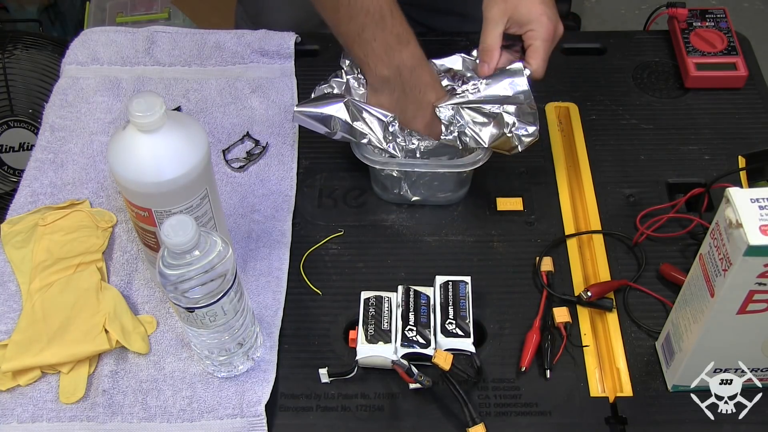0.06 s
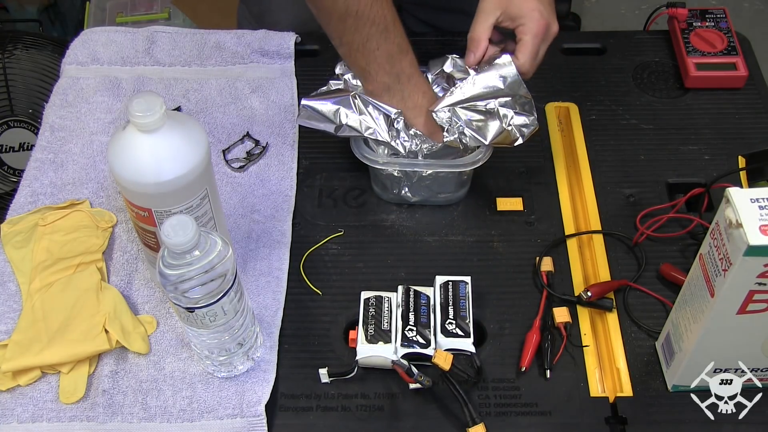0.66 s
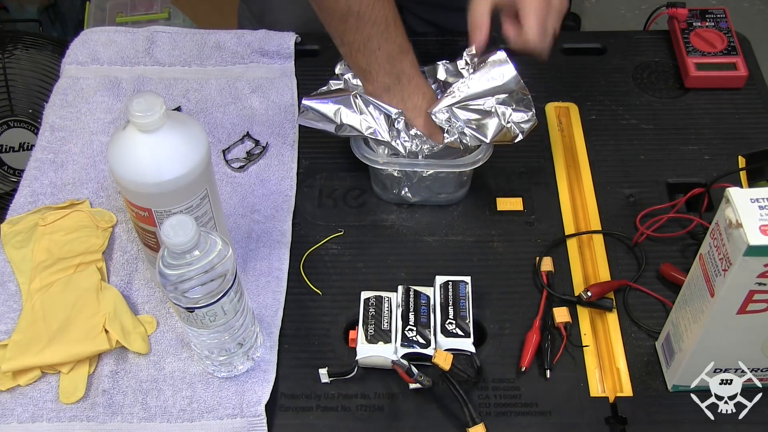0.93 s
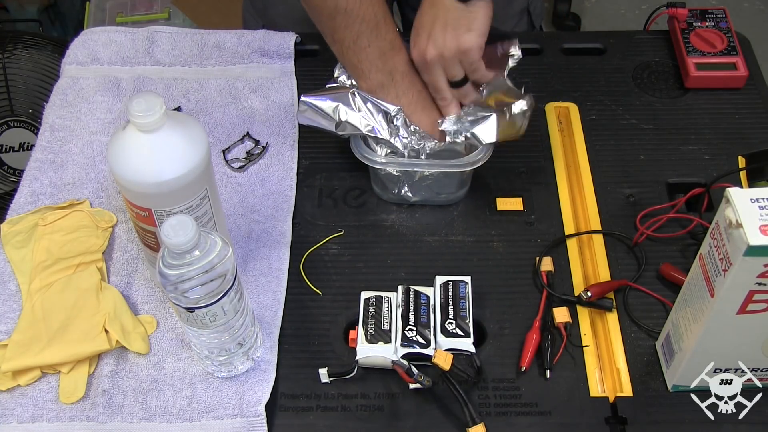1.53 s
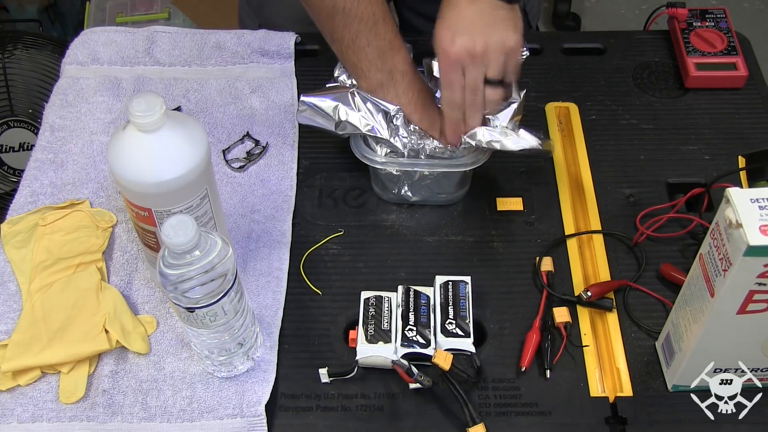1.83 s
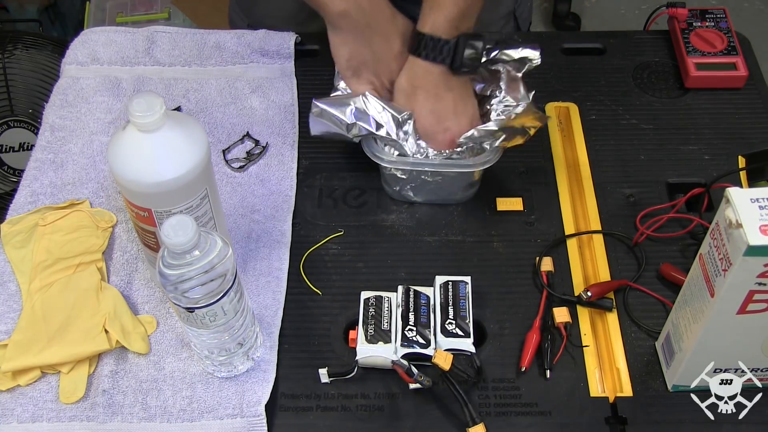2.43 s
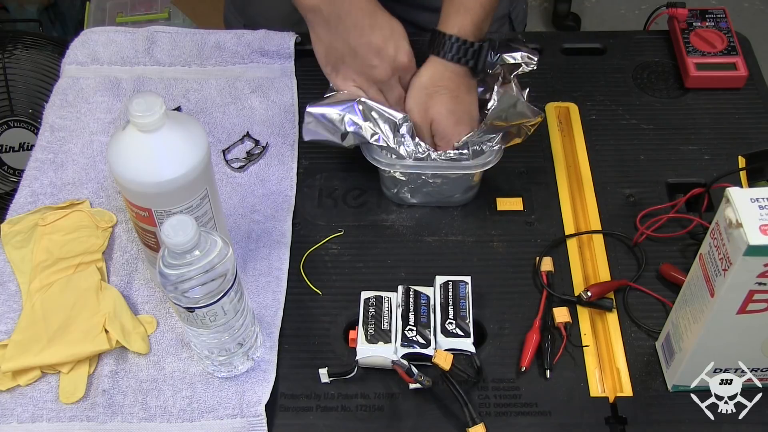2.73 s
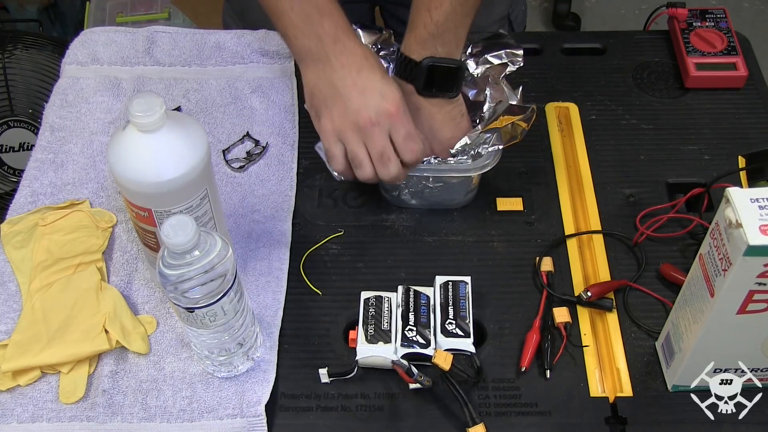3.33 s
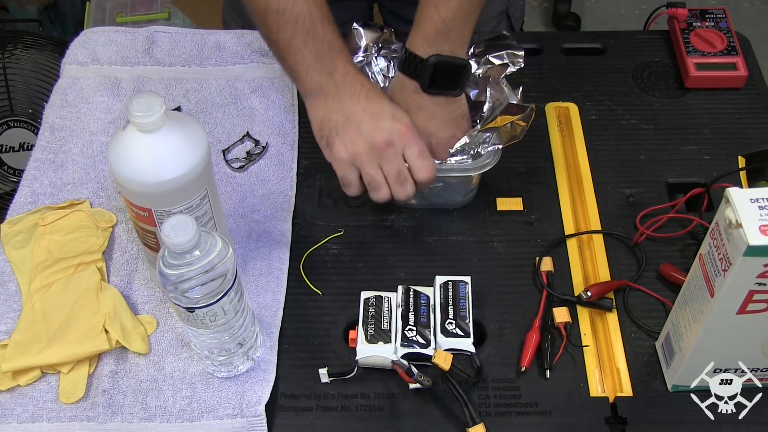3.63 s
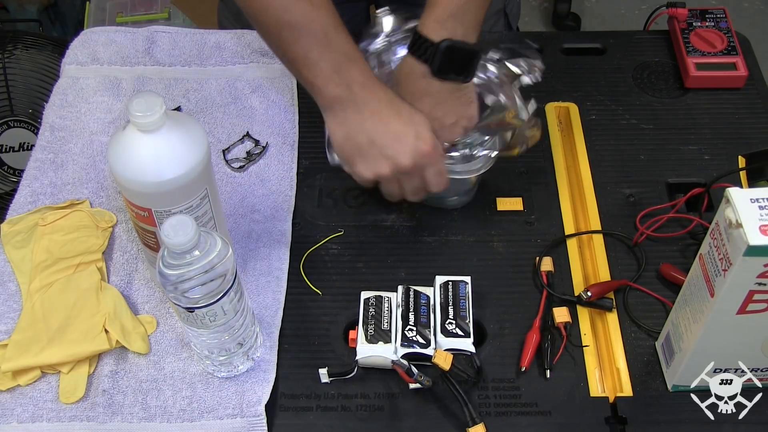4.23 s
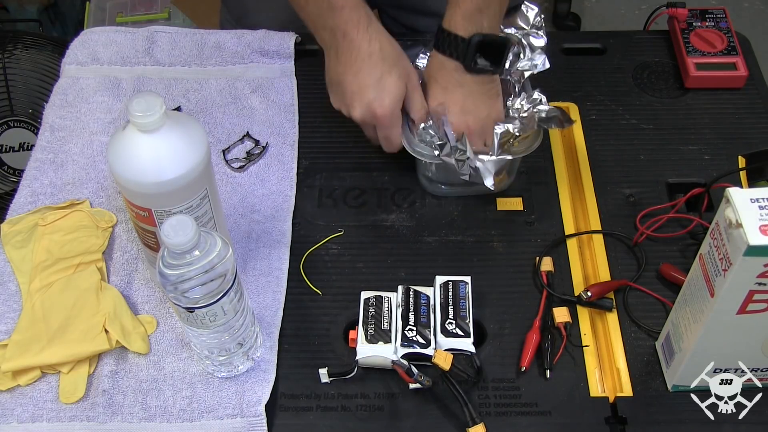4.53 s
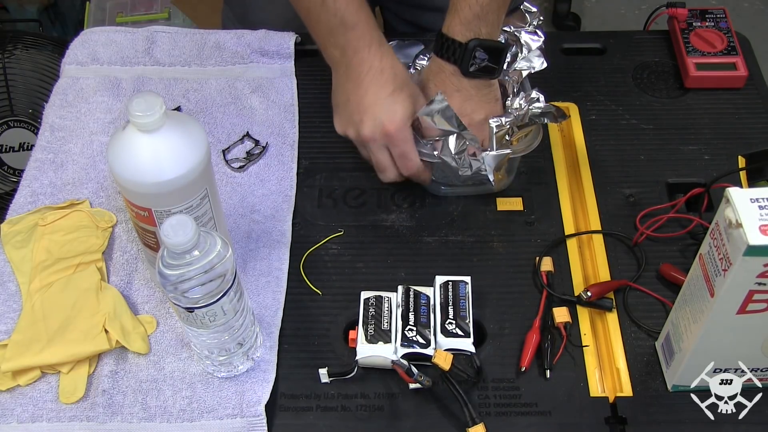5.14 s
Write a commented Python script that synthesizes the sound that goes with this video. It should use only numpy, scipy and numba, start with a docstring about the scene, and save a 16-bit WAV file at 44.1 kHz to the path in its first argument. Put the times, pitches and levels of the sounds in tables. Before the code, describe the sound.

Bright, irregular crinkling of aluminum foil runs from start to finish as it is pushed into a plastic container. Folds snap sharply between lighter rustles, while the container gives soft hollow bumps against the workbench. A short rasp of foil on the rim comes late, followed by more crackling. The microphone is near, in a small room with slight reverberation, and nearly everything is in the left channel.

```python
"""Aluminium foil crumples as two hands press it, squeeze by squeeze, into a plastic tub on a workbench.
Thousands of tiny creases flip and ring the facets between them; now and then a fold snaps, a panel
buckles or pops, or the sheet scrapes the rim. The fingers rub and knock the tub into resonance and make
the bench rumble. A small workshop adds its reverberation; the sound lies almost wholly on the left."""
import sys
import numpy as np
from scipy import signal
from scipy.fft import rfft, irfft
from scipy.io import wavfile
from scipy.ndimage import uniform_filter1d
from numba import njit

SR = 44100
rng = np.random.default_rng(int(sys.argv[2]) if len(sys.argv) > 2 else 0)


def inscribe(sig):
    """Save sig as 16-bit PCM at rate SR to the path in sys.argv[1].

    A 1-D sig is mono; a 2-D sig holds one channel per row.
    Samples are clipped to [-1, 1] before scaling.
    """
    pcm = np.round(np.clip(np.atleast_2d(sig).T, -1, 1) * 32767)
    wavfile.write(sys.argv[1], SR, pcm.astype(np.int16))


N = 232892
TIME = np.arange(N) / SR

# spectra of the still room, bench, rubbed tub, scraped rim and radiating foil: frequency_hz, gain_db
AIR_SPECTRUM = [(25, -26), (55, 4), (130, 6), (300, -11), (1000, 4), (4000, -17), (16000, -46)]
BENCH_SPECTRUM = [(20, -13), (50, -3), (85, -2.5), (130, 2), (220, -10), (1000, -49)]
RUB_SPECTRUM = [(40, -44), (100, -17.5), (155, -10), (210, -8.5), (260, -3), (350, 0.5), (600, -5),
                (1200, -13.5), (4000, -24)]
RASP_SPECTRUM = [(500, -44), (1100, -29), (1500, 3), (1950, 6), (2350, 4), (3000, -1), (5000, -8.5),
                 (12000, -27)]
FOIL_SPECTRUM = [(150, -18.5), (350, -9), (700, -5.5), (1100, -2.5), (1480, -1), (1800, -1.5), (3000, 1),
                 (5300, 1), (7000, -3), (10000, -9), (13000, -8.5), (16000, -21.5)]
# the hands put their weight on the bench: start_s, length_s, level_db
BENCH_LEANS = [(1.552, 0.15, -49), (2.28, 0.19, -54), (2.602, .11, -47), (3.02, 0.036, -52),
               (4.387, .04, -45), (4.49, 0.14, -53)]
# resonances of the tub: frequency_hz, gain_db, t60_s
TUB_MODES = [(84, -28, .15), (212.7, 4.5, 0.2), (254, 7.5, 0.31), (315.5, 0.5, 0.12), (420, -12.5, 0.063),
             (522, -3, 0.045), (760, 2.5, 0.087), (1020, -5, 0.071), (1486, 11, 0.15), (1880, -52, 0.07),
             (2440, -2, 0.059)]
# the tub flexes and bumps on the bench: start_s, level_db, pitch_hz
TUB_KNOCKS = [(.019, -33, 445), (.024, -37, 262), (.348, -31, 533), (.509, -29, 400), (0.923, -27.5, 451),
              (1.144, -27.5, 435), (1.274, -21.5, 670), (1.326, -27, 573), (1.495, -28, 570),
              (1.565, -32, 635), (1.79, -29, 585), (2.039, -27, 395), (2.065, -23.5, 352),
              (2.091, -20.5, 286), (2.405, -28, 450), (2.613, -27, 426), (3.023, -31, 320),
              (4.317, -29.5, 335), (4.402, -26.5, 328), (4.421, -30, 250), (4.506, -31, 269),
              (4.531, -28.5, 350), (4.607, -25.5, 576), (4.686, -25.5, 418), (4.997, -33, 510)]
# foil dragged over the rim: time_s, level_db
RIM_SCRAPE = [(4.22, -54), (4.27, -33), (4.32, -35), (4.36, -30.5), (4.42, -27.5), (4.48, -40),
              (4.55, -28.5), (4.68, -58), (4.76, -75)]
# wide panels pop through: start_s, level_db, pitch_hz
PANEL_POPS = [(.022, -26.5, 990), (1.275, -20, 1490), (1.493, -19, 1245), (1.562, -22.5, 720),
              (1.608, -23.5, 1200), (1.632, -23, 1094), (2.089, -22, 1450), (3.021, -20.5, 1500),
              (3.455, -28, 1060), (3.926, -24, 1360), (4.705, -27.5, 1200)]
# a panel gives way in a run of creases: start_s, level_db, fine_relative_db, length_s
PANEL_BUCKLES = [(0.02, -24.5, 1, 0.0096), (.475, -23, 1, 0.014), (0.517, -28, 2, 0.0032),
                 (1.14, -24.5, 5, 0.034), (1.264, -23.5, 4, 0.044), (1.403, -27, -4, 0.056),
                 (1.496, -23.5, -2, 0.018), (1.556, -26, 1, 0.0082), (1.681, -25.5, -2, 0.019),
                 (1.883, -24.5, 4, 0.012), (2.02, -25, -2, 0.081), (2.407, -25, -12, .0043),
                 (3.018, -21, -9, 0.0098), (3.087, -34, 9, 0.036), (3.268, -30, 7, 0.04),
                 (3.694, -21.5, -9, 0.013), (3.77, -29, 4, 0.016), (3.841, -31, 2, 0.02),
                 (3.923, -30, -2, 0.02), (4.09, -27, -3, 0.0078), (4.147, -37, 0, .008),
                 (4.529, -29.5, 3.5, 0.063), (4.821, -19.5, 3, 0.025), (5.233, -27.5, 1, 0.019)]
# loud folds snap: start_s, level_db, pitch_hz, treble_relative_db
FOLD_SNAPS = [(.0194, -8.5, 4400, -7), (.0632, -19, 3340, 9), (.231, -19.5, 2000, -11),
              (.2643, -19, 5600, 4), (.3326, -17, 3950, 5), (.413, -18, 5000, -7), (.4875, -12.5, 4570, 5),
              (.5096, -8, 4700, 1), (.5456, -12.5, 5340, 2), (.6516, -18.5, 5750, 10),
              (.6771, -18, 3180, 6), (.759, -13.5, 4670, 4), (.9028, -12.5, 4980, -5),
              (.9563, -15, 5300, 9), (1.1033, -21.5, 3600, 6), (1.161, -11, 3970, 11),
              (1.2133, -14.5, 5900, 13), (1.398, -15, 3690, 9), (1.4204, -8.5, 5000, 5),
              (1.4915, -10.5, 3600, -4), (1.5634, -7, 4600, 15), (1.7903, -17, 3320, -1),
              (1.8051, -6, 3080, -2), (1.8817, -10, 2740, -2), (1.9654, -18.5, 3950, -19),
              (2.0254, -11.5, 1436, 13), (2.0669, -11, 4640, -10), (2.1635, -15, 2350, -6),
              (2.2905, -12.5, 1600, 8), (2.394, -28, 3330, -9), (2.5037, -12, 5270, 7),
              (2.707, -13.5, 3500, -3), (2.717, -12.5, 3660, -8), (2.7652, -16, 2900, 8),
              (2.7964, -12.5, 1260, -10), (2.8574, -20.5, 1470, 4), (2.8893, -9.5, 2810, 4),
              (2.9064, -16, 2670, -8), (2.9892, -26, 1430, -2), (3.02, -7, 5900, 0),
              (3.1014, -10.5, 2140, 8), (3.1135, -12.5, 2240, 2), (3.216, -20, 1570, 6),
              (3.2665, -12.5, 11300, 22), (3.3409, -11, 1820, -3), (3.419, -17, 6600, 29),
              (3.4305, -17.5, 1780, 2), (3.4461, -16.5, 1100, 16), (3.489, -13.5, 7850, 9),
              (3.5214, -14, 2670, 0), (3.5384, -17, 3270, -2), (3.6764, -17.5, 1590, 14),
              (3.6952, -13.5, 1725, 22), (3.71, -8.5, 2540, 10), (3.8062, -19, 1910, -5),
              (3.8522, -15, 5600, 3), (3.8965, -15, 5400, 0), (3.922, -12.5, 2280, -10),
              (3.9914, -20, 4200, 4), (4.0328, -14.5, 5600, 9), (4.089, -15, 5220, 0),
              (4.1415, -14.5, 1050, -3), (4.1937, -19.5, 3980, 0), (4.379, -13.5, 2265, -9),
              (4.4415, -13.5, 2730, -18), (4.5312, -7.5, 2360, -4), (4.7106, -12.5, 3450, 4),
              (4.7357, -14.5, 5400, 3), (4.893, -14, 2080, 5), (4.9362, -10, 3570, -5),
              (4.982, -19, 3250, 10), (5.035, -16.5, 1430, -8), (5.054, -15, 3170, 8),
              (5.1056, -18, 5300, 15), (5.2381, -13, 3580, 8), (5.2764, -15.5, 4240, 3)]
# how flat the fingers lie, which evens out the crackle: time_s, flatness (0 to 1)
FINGER_FLATNESS = [(0, 0.87), (1.5, 0), (1.62, 0.53), (1.8, 0), (2.2, 0.97), (2.6, 0.1), (2.8, 0.12),
                   (4.2, 0.04), (4.3, 0.2), (4.7, 0.4), (4.9, 0.5)]
# rustle of the lightly held sheet, dipping three times as the grip changes: time_s, level_db
LIGHT_HOLD = [(0, -26.5), (.18, -38.5), (.58, -35), (.8, -36.5), (.97, -36.5), (1.03, -49), (1.125, -38),
              (1.17, -33.5), (1.91, -34), (1.95, -45), (2.0, -43), (2.05, -33.5), (3.3, -34.5),
              (4.1, -39.5), (4.74, -39.5), (4.8, -50), (4.84, -33.5), (5.28, -40.5)]
# squeezes of the fingers: start_s, length_s, crackle_db, fine_relative_db, broad_relative_db, push_db
FINGER_SQUEEZES = [(0, 0.039, -26, 3, 2, -34.5), (0.252, 0.14, -30, 1, 1, -53),
                   (0.414, 0.15, -28, -1, -3, -48), (0.628, 0.043, -36.5, -2, 6.5, -59),
                   (0.716, 0.044, -30.5, 2.5, -14, -58), (0.826, 0.048, -30.5, 1, 3, -64),
                   (0.914, 0.047, -28.5, 1, -5, -45), (1.135, 0.18, -30, -1, -17, -48.5),
                   (1.237, .1, -24, 1.5, -1.5, -42.5), (1.398, 0.056, -26, 5.5, -1, -36),
                   (1.49, 0.046, -23, -3, -7, -50), (1.547, 0.14, -22.5, -1, -1.5, -37),
                   (1.745, 0.093, -33.5, 1, 7.5, -45.5), (1.832, 0.096, -27.5, -4, -15, -50),
                   (2.017, 0.13, -28.5, 6, 7.5, -41), (2.202, 0.16, -27, 1, 1.5, -38.5),
                   (2.359, 0.28, -26, -1, -0.5, -45), (2.695, 0.075, -27, -9, 1.5, -58),
                   (2.777, 0.015, -31, 4, 2, -52), (2.889, 0.046, -30, -6, 2, -45),
                   (2.947, 0.19, -25.5, 3, 0.5, -44.5), (3.146, 0.042, -29.5, 1.5, -17, -49),
                   (3.241, 0.063, -26.5, -2, 1, -61), (3.429, 0.17, -36.5, -7, 7.5, -51),
                   (3.669, 0.085, -27, -1, 0.5, -56), (3.833, 0.051, -46, -7, 8, -39.5),
                   (3.903, .04, -33, 3, 10, -52), (4.031, 0.022, -34.5, 2, -1, -64),
                   (4.135, 0.08, -33, -4, 2.5, -41), (4.232, 0.26, -37, 2, 5.5, -47),
                   (4.499, 0.22, -28.5, -0.5, 3.5, -44), (4.734, 0.023, -28.5, -2, -16, -64),
                   (4.811, 0.12, -30, -7, -5, -67), (4.919, 0.085, -23.5, -0.5, -1.5, -46),
                   (5.017, 0.019, -32.5, 2, 5, -62), (5.214, 0.05, -33, -1, 3, -42.5)]


def undb(db):
    """Decibels to amplitude ratio."""
    return 10 ** (np.asarray(db) / 20)


def unit(x):
    """Normalisation to rms 1."""
    return x / np.sqrt(np.mean(x ** 2))


def curve(table):
    """Linear interpolation of (time_s, value) rows at every sample."""
    return np.interp(TIME, *np.transpose(table))


def add(out, start_s, sound):
    """Superposition: mix a sound in at its start time."""
    i = max(int(start_s * SR), 0)
    out[i:i + len(sound)] += sound[:max(N - i, 0)]


def colour(x, spectrum, size=4096):
    """Minimum-phase filtering: folding the cepstrum gives a causal response with this spectrum."""
    hz, db = np.transpose(spectrum)
    gain_db = np.interp(np.log(np.fft.rfftfreq(size, 1 / SR) + 1), np.log(hz), db)
    cepstrum = irfft(np.log(undb(gain_db)))
    cepstrum[1:size // 2] *= 2
    cepstrum[size // 2 + 1:] = 0
    return signal.fftconvolve(x, irfft(np.exp(rfft(cepstrum))))[:len(x)]


def room_air():
    """Ambient noise: the steady, mostly low hush of the still room."""
    return undb(-55.5) * unit(colour(rng.standard_normal(N), AIR_SPECTRUM))


def workshop(x, near_s=0.0017, near_db=-7, room_db=-10, t60_low_s=0.47, t60_high_s=0.082):
    """Diffuse reverberation: echoes of scattered creases sum to noise that follows each band's energy."""
    t, out = TIME[:SR // 2], x
    edges_hz = [180, 370, 700, 1250, 1750, 2700, 4000, 6000, 9500, 16500]
    near = np.exp(-2 * t / near_s) * (t > .001)  # early scatter from the bench
    for lo, hi, t60 in zip(edges_hz, edges_hz[1:], np.linspace(t60_low_s, t60_high_s, len(edges_hz) - 1)):
        band = signal.butter(3, [lo, hi], "bandpass", fs=SR, output="sos")
        tail = undb(-60 * t / t60) ** 2 * (t > .006)
        echoes = undb(near_db) ** 2 * near / near.sum() + undb(room_db) ** 2 * tail / tail.sum()
        energy = signal.fftconvolve(signal.sosfilt(band, x) ** 2, echoes)[:N]
        out = out + np.sqrt(np.abs(energy)) * unit(signal.sosfilt(band, rng.standard_normal(N)))
    return out


def slips(per_s):
    """Stick-slip friction: small impulses at random moments."""
    return rng.standard_normal(N) * (rng.random(N) < per_s / SR)


def avalanches(per_s, fade_s, share):
    """Chain reaction: one crease sets off its neighbours, so a gain of rms 1 jumps and fades."""
    triggers = (rng.random(N) < per_s / SR) * rng.uniform(0.31, 1, N) ** 2
    power = signal.lfilter([1], [1, -np.exp(-1 / (fade_s * SR))], triggers)
    power /= uniform_filter1d(power, size=3500) + 0.066 * power.mean()
    return unit(np.sqrt(1 - share + share * power))


def stroke(length_s, attack_s=.014, yield_db=-2.0, release_s=0.0053):
    """Stress relaxation: the force of a hand rises, sags as the foil yields, and is released."""
    t = TIME[:SR // 2]
    attack = np.minimum(t / attack_s, 1)
    sag = undb(yield_db * np.minimum(t / length_s, 1))
    return attack * sag * np.exp(-np.maximum(t - length_s, 0) / release_s)


def bench(on_tub, share_db=-16.5):
    """Structure-borne sound: the bench rumbles under part of every push and under the leaning hands."""
    force = undb(share_db) * on_tub
    for start_s, length_s, db in BENCH_LEANS:
        add(force, start_s, undb(db) * stroke(length_s))
    return unit(colour(slips(per_s=400), BENCH_SPECTRUM)) * force


def tub(foil, on_tub, thud_s=0.0029, coupling_db=-8.5):
    """Forced vibration: rubbing, knocks and the foil lying inside drive the modes of the plastic tub."""
    t = TIME[:SR // 4]
    body = np.zeros(len(t))
    for hz, db, t60 in TUB_MODES:
        gain = undb(db) * 2 * np.log(1000) / (t60 * SR)  # gives the listed gain at resonance
        body += gain * np.cos(2 * np.pi * hz * t) * undb(-60 * t / t60)
    contact = unit(colour(slips(per_s=700), RUB_SPECTRUM)) * on_tub
    thud = np.e * t / thud_s * np.exp(-t / thud_s)
    for start_s, db, hz in TUB_KNOCKS:  # the pitch depends on where the fingers hold the wall
        add(contact, start_s, undb(db - 1.5) * np.sin(2 * np.pi * hz * t) * thud)
    return contact + signal.fftconvolve(contact + undb(coupling_db) * foil, body)[:N]


def scraping():
    """Stick-slip friction: foil rasps over the rim in short catches."""
    rasp = unit(colour(slips(per_s=2500), RASP_SPECTRUM))
    catches = avalanches(per_s=84, fade_s=0.0073, share=0.67)
    return rasp * catches * undb(curve(RIM_SCRAPE))


def facet(t, hz, ring_s):
    """Free vibration: one main mode and two weaker neighbours; small, stiff facets decay sooner."""
    neighbour_hz = hz * np.exp(0.18 * rng.standard_normal((2, 1)))
    neighbours = np.sin(2 * np.pi * (neighbour_hz * t + rng.random((2, 1)))).sum(0)
    decay = np.exp(-t / ring_s * np.sqrt(hz / 4000))
    return (np.sin(2 * np.pi * hz * t) + 0.56 * neighbours) * decay


def popping(ring_s=0.002, rise_s=.0005):
    """Snap-through: wide, slack panels flip with a low, hollow note."""
    out, t = np.zeros(N), TIME[:SR // 20]
    for start_s, db, hz in PANEL_POPS:
        add(out, start_s, undb(db + 4.5) * facet(t, hz, ring_s) * (1 - np.exp(-t / rise_s)))
    return out


def registers(x, edges_hz=(2400, 7500)):
    """Crossover filtering: the bands of broad facets, middle creases and fine creases."""
    low, low_and_middle = (signal.sosfiltfilt(signal.butter(3, hz, fs=SR, output="sos"), x)
                           for hz in edges_hz)
    return low, low_and_middle - low, x - low_and_middle


@njit
def ring(start, hz, decay_s, amplitude):
    """Modal superposition: damped sines, each starting at its own sample."""
    out = np.zeros(N)
    for k in range(len(start)):
        phasor = amplitude[k] + 0j
        step = np.exp((2j * np.pi * hz[k] - 1 / decay_s[k]) / SR)
        for i in range(start[k], min(N, start[k] + int(5 * decay_s[k] * SR))):
            phasor *= step
            out[i] += phasor.imag
    return out


def creases(per_s, spread_db, ring_s, modes=4):
    """Power-law crackle of rms 1: each crease flips and rings a few modes; most are small, a few large."""
    count = int(per_s * N / SR)
    when, rank = rng.random((2, count))
    place, damping, sign = rng.random((3, count, modes))
    hz = 200 + 16000 * place ** 2
    stiffness = np.sqrt(hz / 4000)
    amplitude = undb(-spread_db * np.log(rank + 0.0083))[:, None] * stiffness * np.sign(sign - .5)
    decay_s = ring_s * (0.4 + 2 * damping ** 2) / stiffness
    start = np.repeat((when * N).astype(np.int64), modes)
    crackle = colour(ring(start, hz.ravel(), decay_s.ravel(), amplitude.ravel()), FOIL_SPECTRUM)
    # the hands feed in energy steadily: a large flip leaves less for its neighbours
    return crackle / np.sqrt(uniform_filter1d(crackle ** 2, size=1000) + 1e-9)


def buckling():
    """Elastic instability: a panel gives way in a dense run of creases that stops quickly."""
    broad, middle, fine = registers(creases(per_s=6000, spread_db=2, ring_s=.0006))
    force, fine_force = np.zeros(N), np.zeros(N)
    t = TIME[:SR // 8]
    onset = 1 + 0.22 * np.exp(-t / 0.00041)  # the first flips are the hardest
    for start_s, db, fine_db, length_s in PANEL_BUCKLES:
        run = undb(db) * onset / (1 + (t / length_s) ** 6)
        add(force, start_s, run)
        add(fine_force, start_s, run * undb(fine_db))
    return force * (broad + middle) + fine_force * fine


def small_folds(force, per_s=15):
    """Random yielding: lesser folds, as strong as the hands press, in rows like FOLD_SNAPS."""
    draws = rng.random((int(per_s * N / SR), 4))
    return [(when * N / SR, 20 * np.log10(force[int(when * N)]) + 13 - 6 * weak,
             2600 * 2.3 ** pitch, 9 * bright) for when, weak, pitch, bright in draws]


def snapping(folds, crack_s=0.00046, ring_s=0.0038):
    """Impulse excitation: a fold cracks over with a hard tick, its facet rings and the sheet shivers."""
    out, t = np.zeros(N), TIME[:SR // 30]
    shiver = .2 * np.exp(-t / .005)
    for start_s, db, hz, treble_db in folds:
        force = rng.choice([-1., 1.], len(t)) * (np.exp(-t / crack_s) + shiver)
        force[0] = 2.3  # the fold inverts in one instant, harder than the slips that follow
        broad, middle, fine = registers(colour(np.roll(force, shift=8), FOIL_SPECTRUM))
        tick = unit(broad + middle + undb(treble_db) * fine)
        ring_db = rng.normal(-1, 4.5)  # relative to the tick
        snap = tick + undb(ring_db) * unit(facet(t, hz, ring_s))
        add(out, start_s, undb(db - 18) * unit(snap))
    return out


def hands(hold_broad_db=0.75, hold_push_db=-20.5):
    """Incoherent addition: the light hold and the squeezes sum in power on three foil bands and the tub."""
    creep = avalanches(per_s=60, fade_s=0.0069, share=0.41)  # lightly held foil moves in fits and starts
    hold = creep * undb(curve(LIGHT_HOLD))
    power = (hold * undb([hold_broad_db, 0, 0, hold_push_db])[:, None]) ** 2
    for start_s, length_s, db, fine_db, broad_db, push_db in FINGER_SQUEEZES:
        shape = stroke(length_s)
        for part, part_db in zip(power, (db + broad_db, db, db + fine_db, push_db)):
            add(part, start_s, (undb(part_db) * shape) ** 2)
    return np.sqrt(power)


def crumpling(on_broad, on_middle, on_fine):
    """Crackling noise: creases flip in avalanches; fine creases or broad facets lead as the grip changes."""
    unevenness = 0.73 * (1 - curve(FINGER_FLATNESS))
    crackle = creases(per_s=3400, spread_db=2.5, ring_s=0.00065)
    crackle *= avalanches(per_s=130, fade_s=0.0052, share=unevenness)
    broad, middle, fine = registers(crackle)
    return on_broad * broad + on_middle * middle + on_fine * fine


def scene():
    """Superposition of foil, tub and bench in the room; the right channel carries only a trace."""
    on_broad, on_middle, on_fine, on_tub = hands()
    foil = crumpling(on_broad, on_middle, on_fine) + buckling() + popping() + scraping()
    foil += snapping(list(FOLD_SNAPS) + small_folds(on_middle))
    direct = foil + tub(foil, on_tub) + bench(on_tub)
    channel_gains = undb([[0], [-47]])
    return channel_gains * (undb(-0.76) * workshop(direct) + room_air())


def record(dry, ceiling=.7, cutoff_hz=16050):
    """Soft saturation rounds the sharpest peaks; a steep low-pass cuts the top."""
    rounded = ceiling * np.tanh(dry / ceiling)
    return signal.sosfilt(signal.ellip(10, .2, 70, cutoff_hz, fs=SR, output="sos"), rounded)


dry = scene()
out = record(dry)
inscribe(out)
```